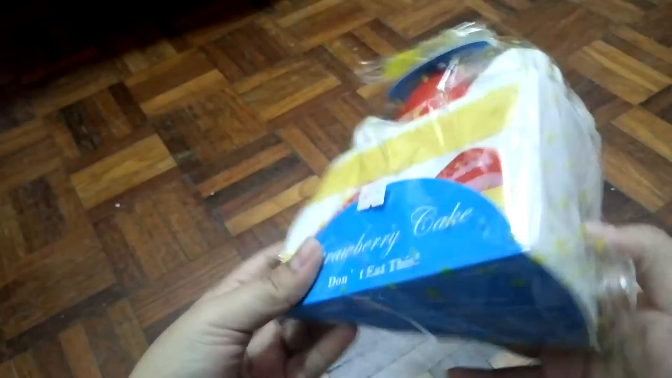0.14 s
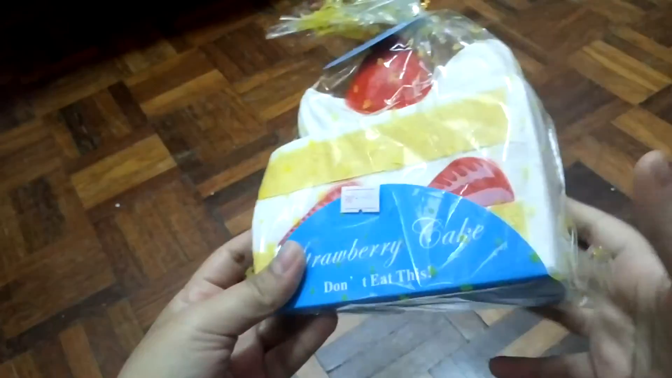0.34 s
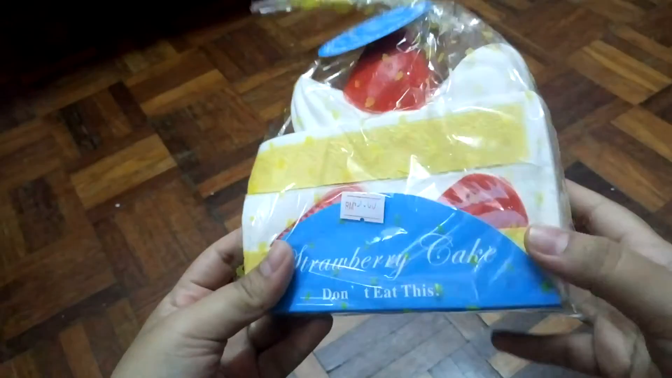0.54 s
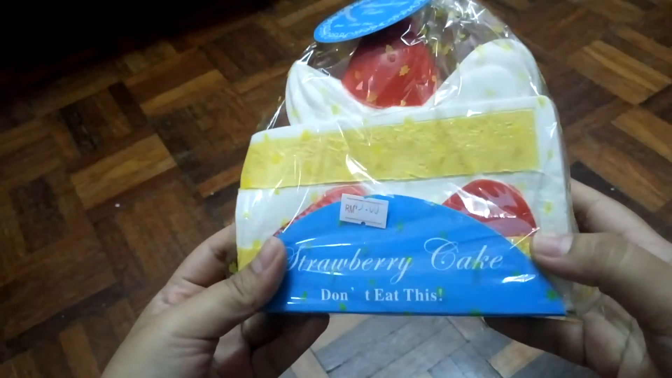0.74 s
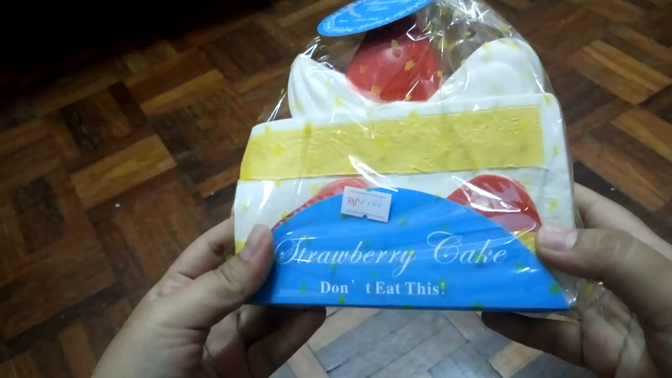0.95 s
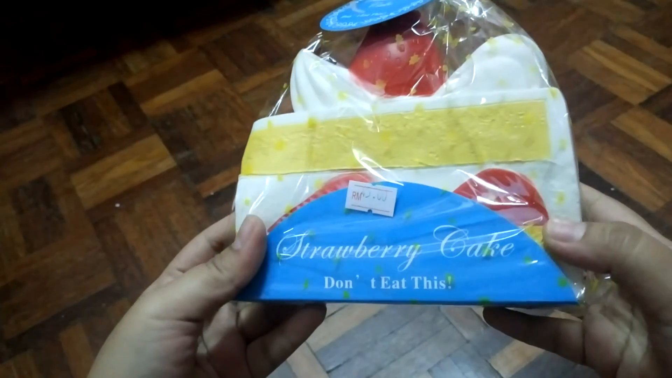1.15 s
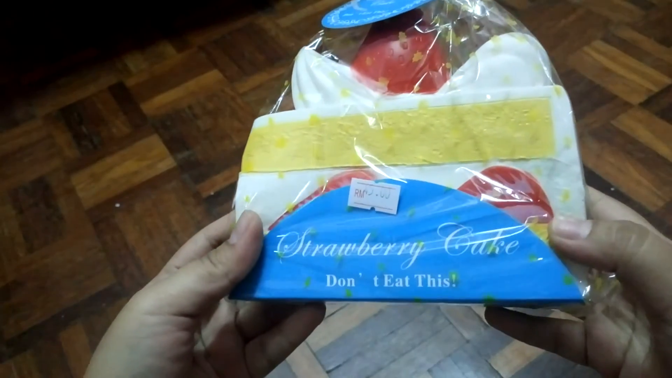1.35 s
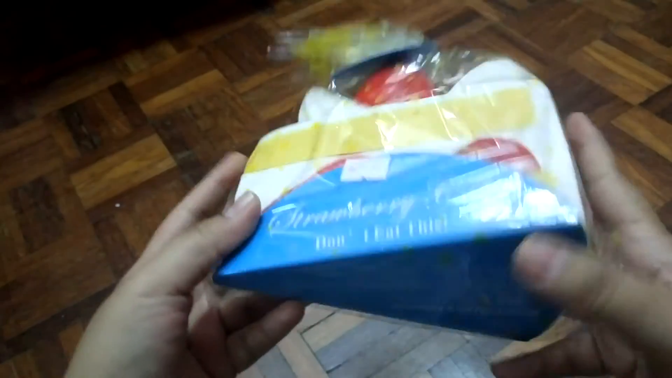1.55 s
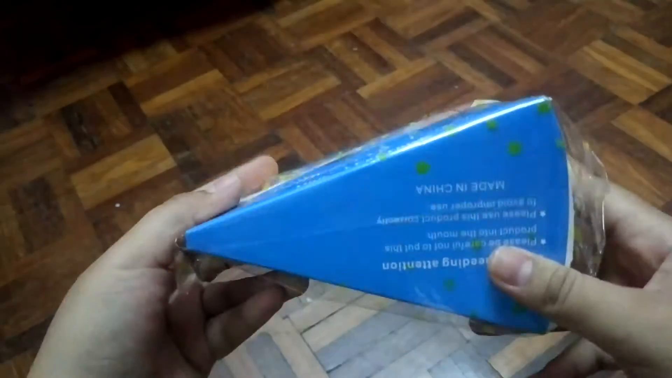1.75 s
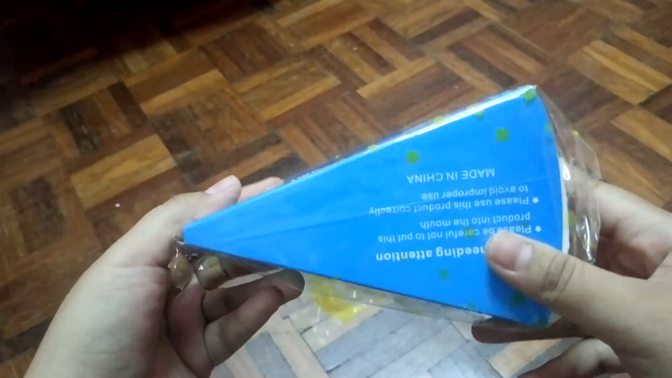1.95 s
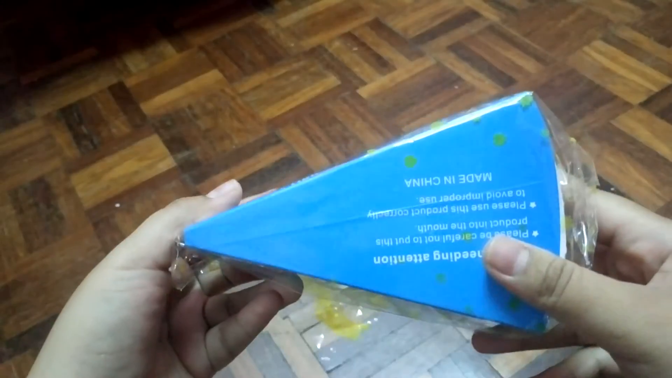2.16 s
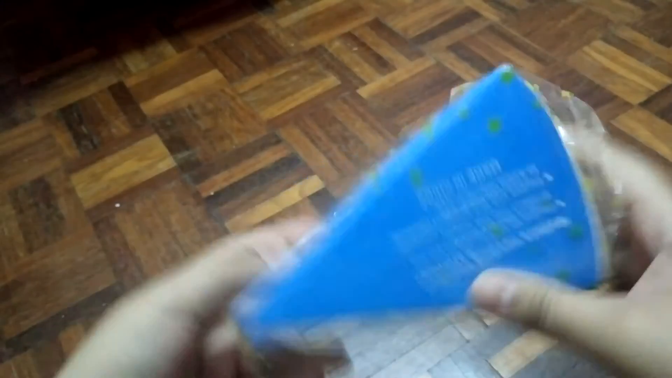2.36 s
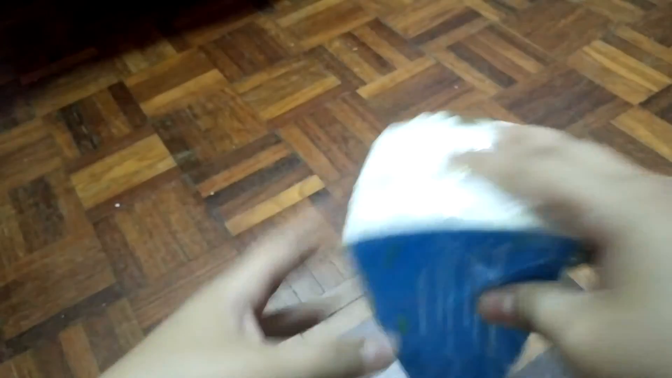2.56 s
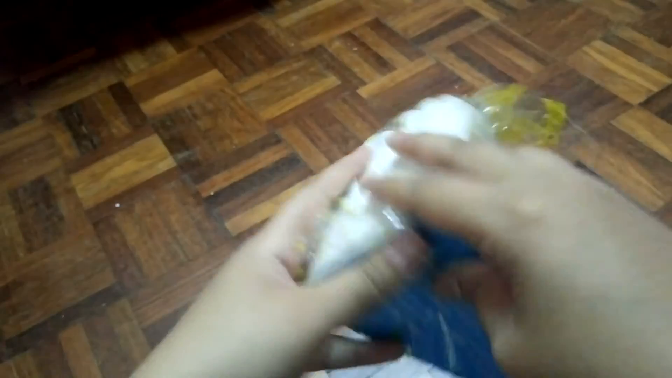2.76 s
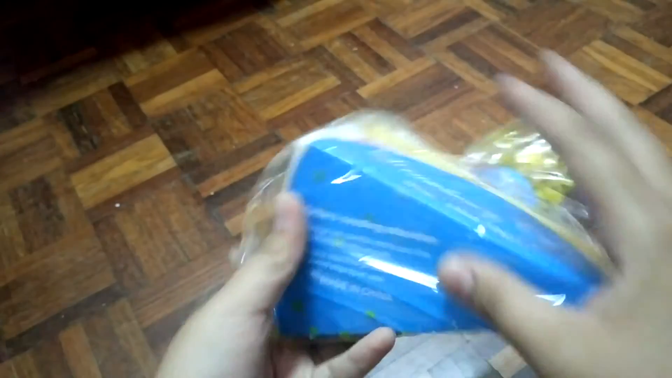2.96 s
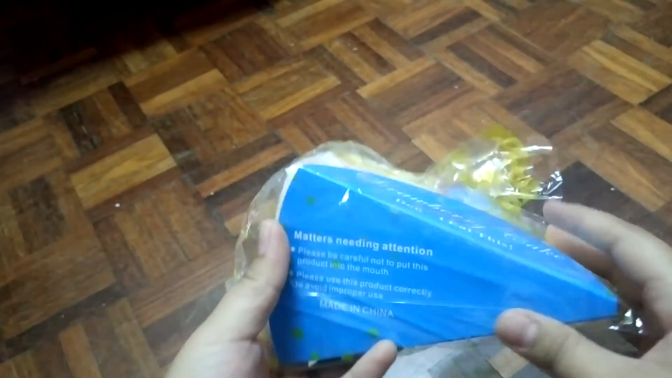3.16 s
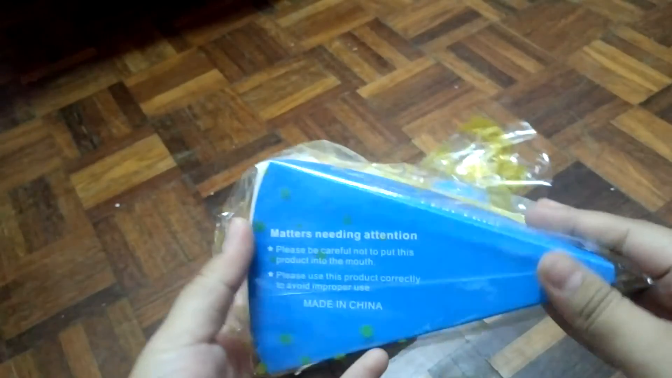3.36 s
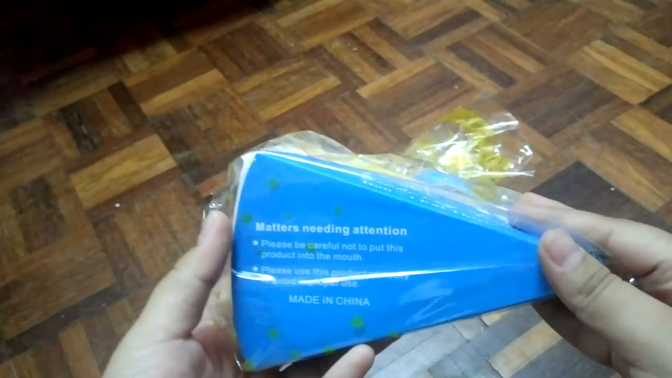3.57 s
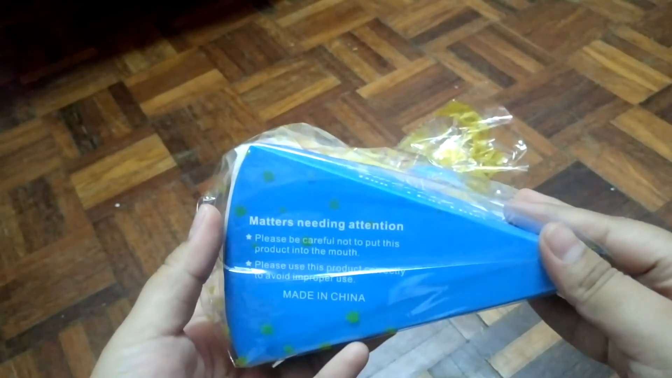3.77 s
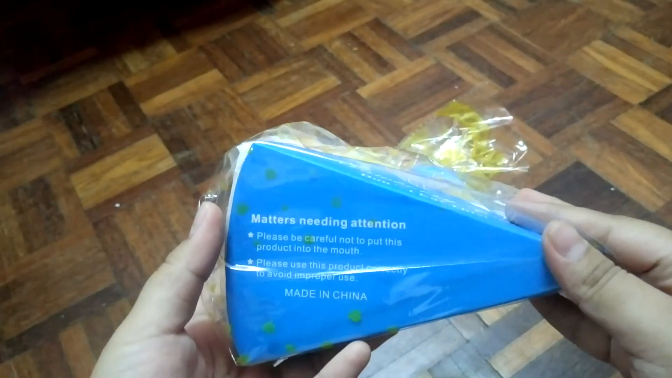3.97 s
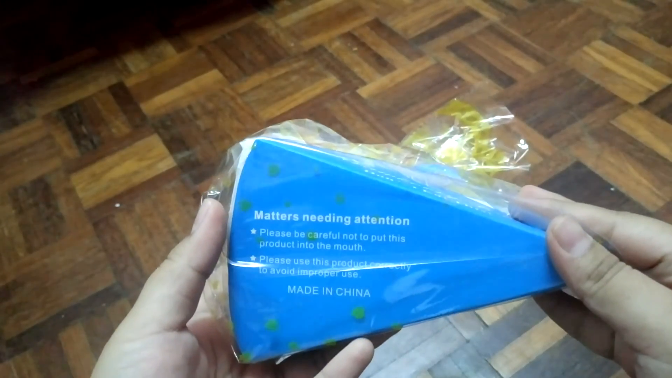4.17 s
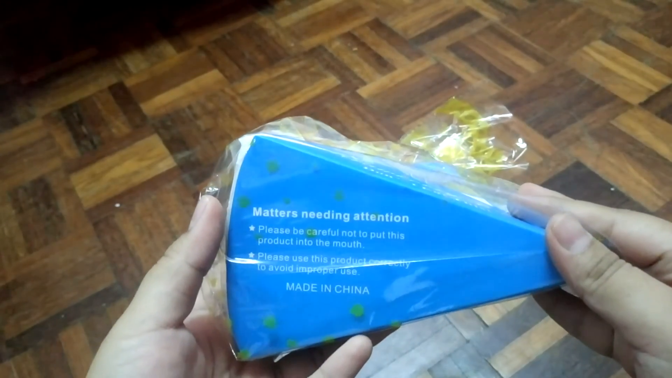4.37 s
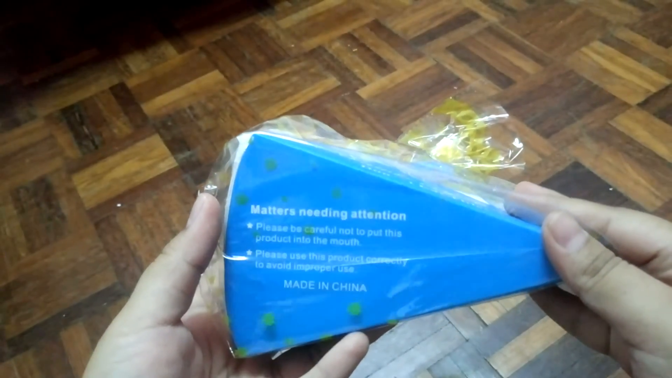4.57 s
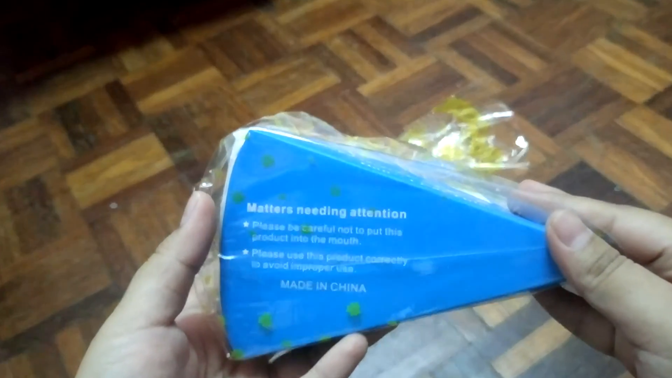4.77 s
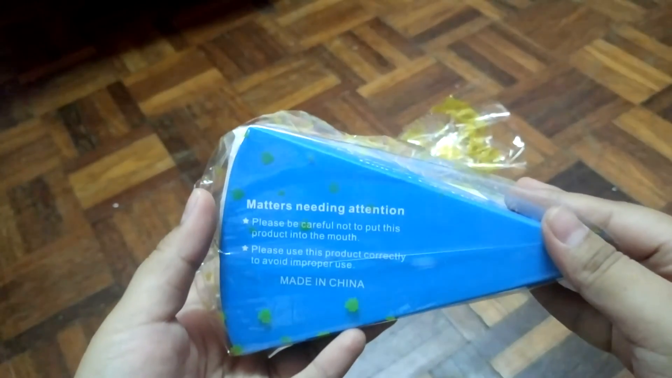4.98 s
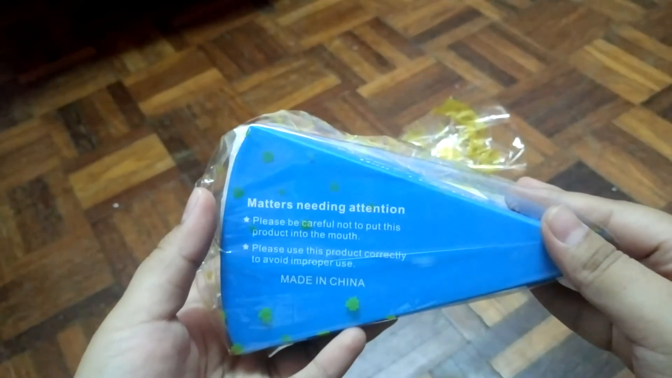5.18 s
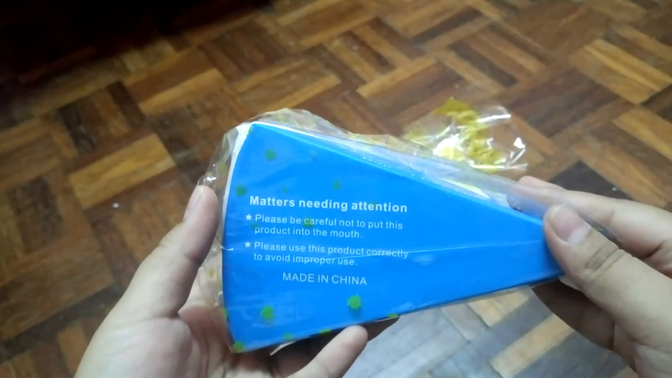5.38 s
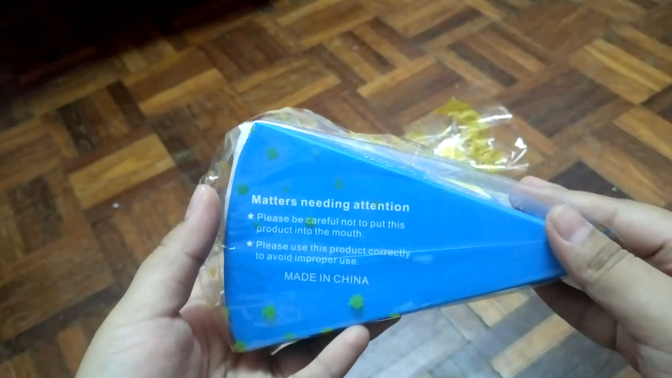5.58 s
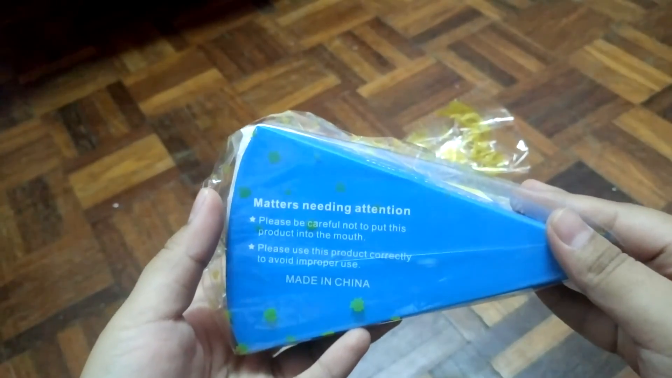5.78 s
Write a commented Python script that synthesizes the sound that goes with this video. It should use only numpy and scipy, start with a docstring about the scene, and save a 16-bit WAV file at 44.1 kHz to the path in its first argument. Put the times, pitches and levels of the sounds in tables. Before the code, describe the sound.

Thin stiff film crackles in uneven bouts, with hard dry snaps, fine fizzing crinkle and a softer rub of fingers. Short lulls with single ticks separate the turns. The biggest flurry comes midway, then the handling dies away to near stillness, with isolated clicks and a dull nudge. The pickup is close, stereo and leaning left, with a short indoor echo and low steady noise.

```python
"""A soft toy turned in a plastic bag

Two hands turn a soft toy in its clear plastic bag, close to the microphone in a small quiet room.
Creases snap by buckling: filtered kicks, over a crinkle of many smaller ones. Sliding film and
fingers are shaped noise, and one faint squeak is an unsteady tone. Then the hands hold almost still:
last ticks and two soft bumps, over steady hiss and a faint mains hum."""
import sys
import numpy as np
from scipy import signal
from scipy.fft import rfft, irfft, next_fast_len
from scipy.io import wavfile
from scipy.ndimage import map_coordinates

SR = 44100
rng = np.random.default_rng(int(sys.argv[2]) if len(sys.argv) > 2 else 0)


def store_wav(level_fs):
    """Save 16-bit WAV to argv[1]."""
    pcm = np.round(np.clip(np.atleast_2d(level_fs), -1, 1) * 32767)
    wavfile.write(sys.argv[1], SR, pcm.T.astype(np.int16))


N = 257103

EAR_LAG_S = .00017  # greatest delay between the two channels


def amp(db):
    """Decibel law: the amplitude ratio of a level."""
    return 10 ** (np.asarray(db) / 20)


def unit(x):
    """Normalisation: x scaled to an rms of 1."""
    return x / np.sqrt(np.mean(x ** 2) + 1e-20)


def along(points, hz):
    """Logarithmic frequency scale: values between (frequency [Hz], value) points."""
    point_hz, value = np.transpose(points)
    return np.interp(np.log(hz + 1), np.log(point_hz + 1), value)


def wobble(rate):
    """Random modulation: a smooth curve through rate random knots a second."""
    knots = rng.standard_normal(int(N * rate / SR) + 4)
    return map_coordinates(knots, [np.arange(N) * rate / SR])


def filtered(x, response):
    """Linear filtering: the spectrum of x times a response of frequency."""
    size = next_fast_len(N + SR // 2)
    hz = np.fft.rfftfreq(size, 1 / SR)
    return irfft(rfft(x, size) * response(hz), size)[..., :N]


def panned(pan_db):
    """Level-difference stereo: gains of mean power 1, the left pan_db above the right."""
    gains = amp(np.array([pan_db, -pan_db]) / 2)
    return (gains / np.sqrt(np.mean(gains ** 2, axis=0)))[..., None]


def rush(spectrum, mono_hz, grain=1):
    """Partial coherence: stereo noise of rms 1, its channels more alike towards the bass."""
    noise = grain * rng.standard_normal((2, N))
    mid, side = filtered(noise, lambda hz: amp(along(spectrum, hz)))
    side = filtered(side, lambda hz: (hz + mono_hz / 2) / (hz + 2 * mono_hz))
    return unit(np.array([mid + side, mid - side]))


# spectrum of the steady hiss: (frequency [Hz], relative density [dB])
HISS_SPECTRUM = [(20, -18), (80, 3.5), (140, -2), (370, -3.5), (550, -10), (1500, -17), (4800, -22.5),
                 (5450, -6), (6600, -15.5), (7900, -36), (12000, -32), (16000, -58)]


def background(hiss_db=-67.0, hum_db=-71, hum_hz=100.7):
    """Stationary noise plus a modulated tone: room air and microphone hiss under a wavering mains hum."""
    t = np.arange(N) / SR
    hum = np.sqrt(2) * np.sin(2 * np.pi * hum_hz * t + 0.18 * wobble(7.9))
    hiss = amp(hiss_db) * rush(HISS_SPECTRUM, mono_hz=663)
    return hiss + amp(hum_db + wobble(5.37)) * hum * panned(pan_db=-3.5)


ATTACK_DB_PER_S, RELEASE_DB_PER_S = 650, 150  # a move starts abruptly; the film settles slowly
REST_DB = -74.5  # crinkle effort of just holding the bag
# moves of the hands: turn to the front, settle, tip over, swing round, change grip, hold almost still:
# (start of full effort [s], hold [s], crinkle effort [dB], finger-rub effort [dB])
HAND_MOVES = [(0, 0.081, -44, -61), (0.147, 0.023, -33.5, -50), (0.261, .1, -37, -55.5),
              (.53, .22, -49, -66), (0.656, .02, -45, -66), (0.796, .63, -62, -74),
              (1.52, 0.095, -39.5, -62), (1.625, .17, -37, -53.5), (1.869, .025, -53, -61.5),
              (1.973, 0.03, -50, -77), (2.319, .12, -44, -59.5), (2.461, 0.081, -31, -48),
              (2.612, 0.26, -39.5, -60), (2.704, .025, -34, -46), (2.856, 0.054, -31.5, -48),
              (3.01, 0.4, -39, -55), (3.375, .085, -34, -49.5), (3.57, 0.077, -43, -61.5),
              (3.76, .025, -58, -68.5), (3.972, .035, -57, -72), (4.32, 0.11, -65, -82),
              (4.474, 0.15, -61.5, -77.5), (4.79, 0.067, -61.5, -71), (4.937, 0.55, -69, -80.5)]


def effort(s):
    """Power summation: crinkle and rub effort in dB at times s, as every move rises, holds and decays."""
    film_power, finger_power = amp(REST_DB) ** 2, 0
    for start, hold, crinkle_db, rub_db in HAND_MOVES:
        rise_db = ATTACK_DB_PER_S * np.maximum(start - s, 0)
        fall_db = RELEASE_DB_PER_S * np.maximum(s - start - hold, 0)
        fade_db = np.minimum(rise_db + fall_db, 100)
        film_power = film_power + amp(crinkle_db - fade_db) ** 2
        finger_power = finger_power + amp(rub_db - fade_db) ** 2
    return 10 * np.log10(film_power), 10 * np.log10(finger_power)


# spectrum of film sliding on film: (frequency [Hz], relative density [dB])
FILM_SPECTRUM = [(800, -61), (2000, -16), (3300, -9.5), (4600, -6), (5400, -12.5), (6050, -0.5),
                 (7000, -24), (8200, -22), (10500, -26.5), (15200, -20.5), (16200, -35)]
# spectrum of fingers rubbing the wrapped toy: (frequency [Hz], relative density [dB])
FINGER_SPECTRUM = [(50, -18), (150, -5.5), (280, 1), (560, 1), (760, -3), (1000, 4), (1900, 0.5),
                   (3400, -1), (7000, -48)]


def sliding(rub_db=1.5, brighten=0.49, soft_db=-39, hiss_db=-7.3):
    """Friction noise: film hisses on film, brighter under a firm grip; fingers rub the toy through it."""
    crinkle_db, finger_db = effort(np.arange(N) / SR)
    film_grain = amp(4.5 * wobble(600) + 3.5 * wobble(80))
    film = amp(crinkle_db + hiss_db) * rush(FILM_SPECTRUM, mono_hz=600, grain=film_grain)
    # the part above about 8 kHz grows with effort past soft_db and shrinks below it
    sizzle = filtered(film, lambda hz: (1 + np.tanh(hz / 1000 - 8)) / 2)
    film = film + sizzle * (amp(brighten * (crinkle_db - soft_db)) - 1)
    rub_grain = amp(4.9 * wobble(300))
    rub = amp(finger_db + rub_db) * rush(FINGER_SPECTRUM, mono_hz=2480, grain=rub_grain)
    both = film * panned(pan_db=2.0) + rub * panned(pan_db=-0.5)
    # the right side hears it slightly later
    lag_s = np.array([[0], [EAR_LAG_S]])
    return filtered(both, lambda hz: np.exp(-2j * np.pi * hz * lag_s))


# colour of the dull flap of the sheet: (frequency [Hz], relative level [dB])
FLAP_COLOUR = [(100, -49), (400, -6), (750, -16.5), (1100, -5.5), (1900, -3), (3400, 8), (4800, 8),
               (8000, -21.5)]
# colour of the bright crack: (frequency [Hz], relative level [dB])
CRACK_COLOUR = [(4000, -23), (7500, -0.5), (10500, -2.5), (13000, -4), (15200, -3)]


def buckle(rows, width_hz, shiver, shiver_s, size=512, lead_count=24):
    """Buckling instability: a kick and brief shiver excite a narrow ring, a duller flap and a bright crack."""
    s, db, ring_hz, flap_db, crack_db, pan_db = np.transpose(rows)
    t, hz = np.arange(size) / SR, np.fft.rfftfreq(size, 1 / SR)
    noise = rng.standard_normal((len(s), 2, size)).swapaxes(0, 1)
    shivering = shiver * noise * np.exp(-t / shiver_s) / np.sqrt(shiver_s * SR / 2)
    kick = rfft((t == 0) + shivering)
    # the sound reaches the louder side first
    side = np.array([-1, 1])[:, None, None]
    delay = lead_count / SR + side * np.tanh(pan_db / 10)[:, None] * EAR_LAG_S / 2
    kick = kick * np.exp(-2j * np.pi * hz * delay)
    # lower rings last longer
    ring_hz = ring_hz[:, None]
    width = width_hz * np.sqrt(ring_hz / np.median(ring_hz))
    ring = (1j * hz * width / (ring_hz ** 2 - hz ** 2 + 1j * hz * width)) ** 2
    parts = [(ring, db),
             (amp(along(FLAP_COLOUR, hz)), db + flap_db),
             (amp(along(CRACK_COLOUR, hz)), db + crack_db)]
    wave = 0
    for colour, part_db in parts:
        part = irfft(kick * colour)
        wave = wave + amp(part_db)[:, None] * part / np.linalg.norm(part, axis=-1, keepdims=True)
    # levels count as the rms of the same energy spread over 1 ms
    wave = wave * panned(pan_db) * np.sqrt(SR / 1000)
    first = np.round(s * SR).astype(int)[:, None] - lead_count
    index = np.maximum(first + np.arange(size), 0)
    return np.array([np.bincount(index.ravel(), w.ravel(), N)[:N] for w in wave])


def crinkle(level_db=-1.5, ring_hz=5650, flap_db=-11, crack_db=-16, pan_db=10, busy_db=-36, count=2900):
    """Crackling noise: small creases give at random, in single ticks if touched lightly, densely if firmly."""
    s = (np.arange(count) + rng.uniform(0, 2, count)) * N / SR / count
    strength, pitch, flap, crack, place = np.clip(rng.standard_normal((count, 5)), -2, 2).T
    work_db = effort(s)[0]
    # a lighter touch flips fewer creases, each a little larger than its share
    sparse_db = .7 * np.minimum(work_db - busy_db, 0)
    gives = rng.uniform(size=count) < amp(sparse_db)
    size_db = 20 * np.log10(unit(amp(11 * np.tanh(strength / 2))))
    size_db = size_db + np.minimum(-sparse_db / 2, 6)
    rows = np.column_stack([s, work_db + level_db + size_db, ring_hz * np.exp(.07 * pitch),
                            flap_db + 5 * flap, crack_db + 4 * crack, pan_db + 5 * place])
    return buckle(rows[gives], width_hz=1300, shiver=.6, shiver_s=.0013)


# decay of the room: (frequency [Hz], reverberation time for 60 dB [s])
ROOM_DECAY = [(250, 0.64), (2500, 0.47), (6000, 0.33), (15000, 0.45)]
# colour of its echo: (frequency [Hz], relative level [dB])
ECHO_COLOUR = [(1000, 1), (3000, -2.5), (5700, -4), (9000, -5)]


def room(x, wet_db, build_s=0.00088):
    """Reverberation: the left channel excites a noise tail that swells fast, then decays by frequency."""
    hz, t, z = signal.stft(rng.standard_normal((2, SR // 2)), SR, nperseg=256)
    decay = amp(-60 * t / along(ROOM_DECAY, hz)[:, None])
    build = 1 - np.exp(-t / build_s)
    tail = signal.istft(z * decay * build, SR, nperseg=256)[1]
    tail = tail / np.linalg.norm(tail, axis=1, keepdims=True)
    source = filtered(x[:1], lambda hz: amp(wet_db + along(ECHO_COLOUR, hz)))
    return panned(pan_db=-2.0) * signal.fftconvolve(source, tail, axes=1)[:, :N]


USUAL_DB = -43  # crinkle effort of an ordinary move


def stray_snaps(level_db=-32, grows=.65, spread_db=2, flap_db=-8, crack_db=-16, least_db=-57, count=120):
    """Random buckling: middle-sized creases snap while effort is high, in rows like the large ones."""
    s = (np.arange(count) + rng.uniform(size=count)) * N / SR / count
    strength, flap, crack = np.clip(rng.standard_normal((count, 3)), -2, 2).T
    work_db = effort(s)[0]
    db = level_db + grows * (work_db - USUAL_DB) + spread_db * strength
    rows = np.column_stack([s, db, flap_db + 4 * flap, crack_db + 5 * crack])
    return rows[work_db > least_db]


RING_HZ, RING_FALL_HZ_PER_DB = 5650, 14  # pitch of the microphone's narrow ring, and its fall as the flap grows
REF_FLAP_DB = -17.5  # flap at which the ring sits at RING_HZ, re ring
# large creases that snap through:
# (time [s], ring level over 1 ms [dB], flap of the sheet [dB re ring], crack [dB re ring])
LARGE_SNAPS = [(.1484, -23, -1.5, -11.5), (.1695, -26, -1, -20), (.4076, -35.5, 2.5, -28),
               (.4464, -29.5, -5.5, -17), (.4845, -33.5, -6, -5), (.531, -35, -13, -13),
               (.5537, -35, -12, -6), (.6335, -33, -2.5, -22), (.6609, -29.5, -7, -7.5),
               (.8655, -28, 1, -14), (.8689, -31.5, -8, -9), (.9214, -28, -17, -11), (.996, -38, -20, -10),
               (1.024, -38.5, -19, -17.5), (1.0652, -29.5, -11.5, -11.5), (1.0924, -43, 5.5, -7),
               (1.1523, -39.5, -5, -29), (1.248, -42.5, -2, -26), (1.284, -35, -1.5, -30),
               (1.2946, -31.5, -22, -19), (1.3138, -39, -4.5, -28), (1.3485, -40, -10, -15),
               (1.368, -35, 1.5, -31), (1.4292, -33, 3, -27), (1.4398, -32, -10, -12),
               (1.6769, -16.5, -11.5, -22), (1.752, -22.5, -12, -10.5), (1.7596, -20.5, -7, -25),
               (1.7797, -26, -21, -11), (1.9002, -30.5, -8, -14), (1.911, -30, -9, -16),
               (2.1409, -35.5, -10.5, -24), (2.1802, -32, -12.5, -14), (2.251, -40, -10, -23),
               (2.3176, -32, -9, -25), (2.3356, -32.5, -10, -7), (2.3911, -27, -9, -14),
               (2.4196, -30, -3, -16), (2.7046, -20.5, -13, -13), (2.7914, -22, -28, -11),
               (2.8572, -18, -21, -14), (2.8754, -15.5, -15, -10.5), (2.957, -27, -32, -13),
               (2.9875, -25.5, -2, -20), (3.0985, -30.5, -8, -8), (3.1157, -24, -9, -14.5),
               (3.249, -27, -25, -1.5), (3.3876, -20.5, -15, -20), (3.4267, -23.5, -5, -30),
               (3.4593, -24.5, -12, -13), (3.5362, -24.5, -7, -9.5), (3.591, -40, 6, -3),
               (3.7567, -27, -4.5, -12), (3.7833, -30, -20.5, -13), (3.93, -42.5, -27, -7),
               (3.9713, -33, -18, -19), (4.0036, -39, -7.5, -15), (4.1322, -47.5, -19, -25.5),
               (4.4685, -37.5, -11, -10), (4.7923, -31.5, -15, -10), (5.1897, -48, -18, -17)]


def snapping(warning_db=-18, pan_db=11, pan_spread_db=3, detune=0.017):
    """Snap-through: a crease ticks faintly, then flips; a stronger flap lowers the ring."""
    s, db, flap_db, crack_db = np.vstack([LARGE_SNAPS, stray_snaps()]).T
    pitch, place, early = rng.standard_normal((len(s), 3)).T
    ring_hz = RING_HZ - RING_FALL_HZ_PER_DB * (flap_db - REF_FLAP_DB)
    ring_hz = ring_hz * np.exp(detune * pitch)
    panel = [ring_hz, flap_db, crack_db, pan_db + pan_spread_db * place]
    snaps = np.column_stack([s, db, *panel])
    tick_s = s - .014 + .004 * np.tanh(early)  # 10 to 18 ms ahead
    ticks = np.column_stack([tick_s, db + warning_db, *panel])
    return buckle(np.vstack([snaps, ticks]), width_hz=1250, shiver=.85, shiver_s=.0021)


def squeak(start_s=1.132, end_s=1.23, pitch_hz=965, level_db=-71):
    """Stick-slip friction: a fingertip on taut film, drawn as one faint sine of unsteady pitch and level."""
    t = np.arange(N) / SR
    press = np.clip(np.minimum(t - start_s, end_s - t) / 0.007, 0, 1)
    phase = 2 * np.pi * np.cumsum(pitch_hz * (1 + .04 * wobble(250))) / SR
    return amp(level_db) * press * amp(3 * wobble(120)) * np.sin(phase)


# soft handling bumps: (time [s], peak before panning [dB], pitch [Hz])
SOFT_BUMPS = [(4.052, -55, 60), (4.566, -43, 75.4)]


def bumps(length_s=0.0053):
    """Damped displacement: a soft push rocks the microphone for about one cycle, mostly on the right."""
    t = np.arange(N) / SR
    push = 0
    for s, db, hz in SOFT_BUMPS:
        swell = np.exp(-.5 * ((t - s) / length_s) ** 2)
        push = push - amp(db) * np.cos(2 * np.pi * hz * (t - s)) * swell
    return push * panned(pan_db=-12)


def scene():
    """Superposition: the bag, its echo in the room, the bumps and the background add."""
    bag = snapping() + crinkle() + sliding() + squeak()
    return bag + room(bag, wet_db=-8.5) + bumps() + background()


def record(dry, top_hz=16000):
    """Band limitation: nothing at or above top_hz is kept."""
    return filtered(dry, lambda hz: hz < top_hz)


dry = scene()
out = record(dry)
store_wav(out)
```